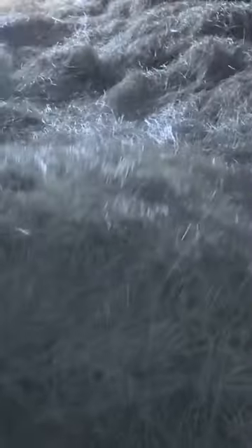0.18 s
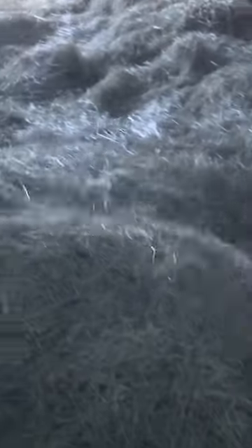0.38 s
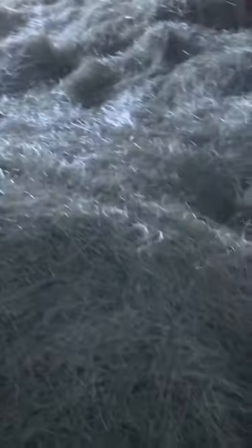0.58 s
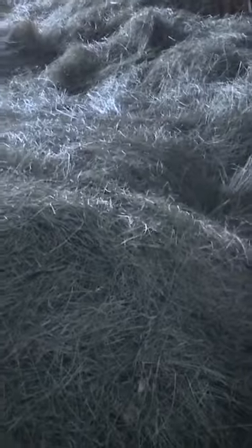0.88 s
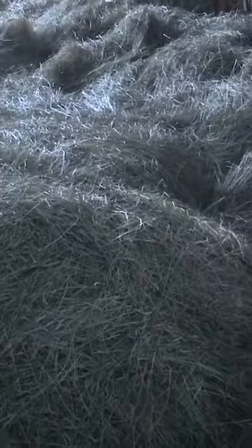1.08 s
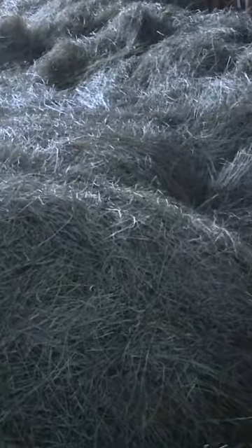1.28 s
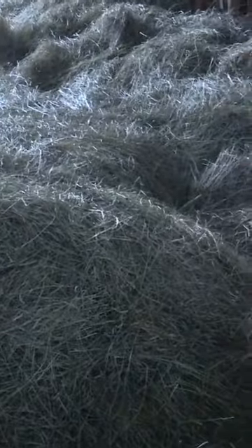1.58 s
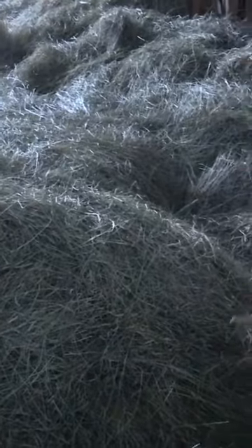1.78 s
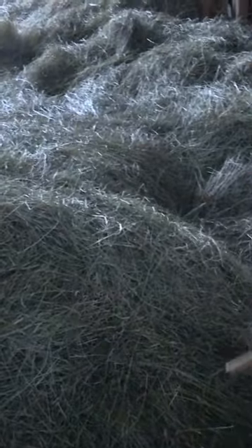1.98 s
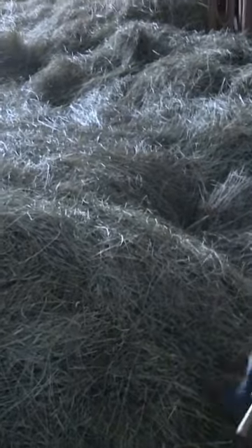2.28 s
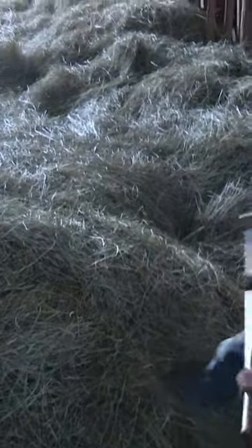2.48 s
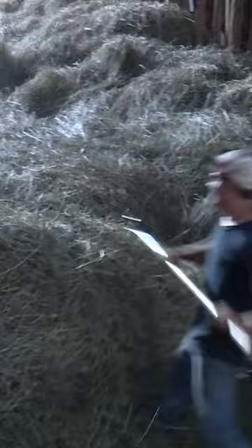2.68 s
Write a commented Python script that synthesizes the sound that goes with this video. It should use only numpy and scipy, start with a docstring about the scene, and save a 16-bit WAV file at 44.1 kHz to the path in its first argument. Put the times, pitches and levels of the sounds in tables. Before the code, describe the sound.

Close to the microphone, loose hay hisses and snaps; sharp ringing metal clinks come early, fainter ones follow over dull handling bumps, and a louder hay rustle ends it, with a barely audible low hum beneath.

```python
"""In a barn, loose dry hay is worked with a pitchfork: rubbing stalks hiss as coloured noise, crackle and snap.
Steel, probably the fork, clinks and rings: each contact is a ragged noise burst that sets decaying modes off.
Close to the microphone, moving about gives soft low buffets, made of low band-passed noise, as is the last low
crunch of the hay. A faint hum, noise through a narrow resonance, lies underneath in still air.
Both channels are alike."""
import sys
import numpy as np
from scipy import signal
from scipy.io import wavfile
from scipy.ndimage import uniform_filter1d

SR = 44100
rng = np.random.default_rng(int(sys.argv[2]) if len(sys.argv) > 2 else 0)


def digitize_waveform(pressure):
    """Quantize a signal to 16-bit integers and store it at the path in sys.argv[1].

    Rows of a 2-D input are taken as channels; values are limited to [-1, 1].
    """
    field = np.atleast_2d(pressure).T
    bounded = np.clip(field, -1, 1)
    quanta = np.round(bounded * 32767).astype(np.int16)
    wavfile.write(sys.argv[1], SR, quanta)


N = 123480
TIME = np.arange(N) / SR


def from_db(db):
    """Decibels to gain."""
    return 10 ** (np.asarray(db) / 20)


def rms_one(x):
    """Scale to unit power."""
    return x / np.sqrt(np.mean(x ** 2) + 1e-20)


def white():
    """White noise."""
    return rng.standard_normal(N)


def in_time(rows):
    """A curve of (time, level) points, read at every sample."""
    return np.interp(TIME, *np.transpose(rows))


def drift(corner_hz):
    """Random wandering with spread 1: noise through two equal low-pass poles, at a fortieth of the rate."""
    step = 40
    r = np.exp(-2 * np.pi * corner_hz * step / SR)
    settling = 2000
    noise = rng.standard_normal(N // step + settling + 2)
    slow = signal.lfilter([1], [1, -2 * r, r * r], noise)[settling:]
    return np.interp(np.arange(N) / step, np.arange(len(slow)), rms_one(slow))


def blow(start, rise, t60):
    """A level that rises in a straight line, then falls by 60 dB in every t60."""
    age = TIME - start
    fall_db = -60 * np.clip((age - rise) / t60, 0, 2)
    return np.clip(age / rise, 0, 1) * from_db(fall_db)


def tone(hz):
    """A sine of height 1 at a random phase."""
    return np.sin(2 * np.pi * (hz * TIME + rng.random()))


def resonate(x, hz, width_hz):
    """A two-pole resonance with gain 1 on top."""
    r = np.exp(-np.pi * width_hz / SR)
    feed = np.array([1, 0, -1]) * (1 - r * r) / 2
    return signal.lfilter(feed, [1, -2 * r * np.cos(2 * np.pi * hz / SR), r * r], x + 1e-18)


def band_pass(x, low_hz, high_hz):
    """Keep what lies between two edges."""
    return signal.sosfilt(signal.butter(2, [low_hz, high_hz], "band", fs=SR, output="sos"), x)


def colour(x, spectrum, flicker_db=0):
    """Half-octave bands, each at its own level and with its own flicker; rms 1."""
    hz, db = np.transpose(spectrum)
    edges = np.geomspace(20, 18000, 21)
    out = 0
    for low, high in zip(edges, edges[1:]):
        if high > hz[0] and low < hz[-1]:
            level_db = np.interp(np.log(low * high) / 2, np.log(hz), db)
            band = band_pass(x, low, high) * from_db(level_db + flicker_db * drift(31))
            out = band - out  # signs alternate, as neighbours oppose in phase at their shared edge
    return rms_one(out)


def split(x, hz):
    """The parts below and above a frequency, each filtered twice for a steep edge."""
    parts = []
    for kind in ("low", "high"):
        once = signal.butter(2, hz, kind, fs=SR, output="sos")
        parts.append(signal.sosfilt(np.tile(once, (2, 1)), x))
    return parts


BASS_HZ, TREBLE_HZ = 2030, 5300  # edges of the middle band of the clinks


def three_bands(x):
    """Bass, middle and treble of a sound."""
    low, rest = split(x, BASS_HZ)
    return np.array([low, *split(rest, TREBLE_HZ)])


# how hard the hay is stirred, heard as the level of the rustle: (time [s], level [dB])
STIRRING = [(0, -34.5), (.12, -36.5), (.34, -33.5), (.44, -38), (.6, -42), (.97, -47.5), (1.2, -42.5),
            (1.4, -42.5), (1.62, -46.5), (1.8, -45.5), (1.95, -52.5), (2.06, -50), (2.13, -44.5),
            (2.27, -43.5), (2.42, -37), (2.65, -31.5)]
# the rustle's treble against its body: (time [s], level [dB])
SHEEN_LEVEL = [(0, 3.5), (.2, -1), (.36, 2.5), (.6, -5.5), (1.3, -0.5), (1.85, -2.5), (2.3, 1),
               (2.55, -1.5), (2.8, -4)]
# colour of the rubbing stalks: (frequency [Hz], level [dB per Hz])
RUSTLE_COLOUR = [(300, -10), (700, -6.5), (1500, -2), (2000, -5), (3000, -1.5), (8400, -2.5), (12000, -4.5),
                 (15500, -8.5)]
SHEEN_HZ = 8300  # the treble starts here
RUSTLE_DB, RUSTLE_FLICKER_DB = 1, 2  # level against the stirring; spread in each band
CRACKLES_PER_S, CRACKLE_DB = 2600, -9.5  # level against the stirring
CRACKLE_SPREAD_DB, CRACKLE_CYCLES = 1, 8  # cycles set how narrow each crackle's resonance is


def hay():
    """Countless stalks rub into a hiss; tiny cracks, each ringing a resonance, stand out of it."""
    sizes = from_db(CRACKLE_SPREAD_DB * np.minimum(rng.exponential(1, N), 5)) * rng.choice([-1, 1], N)
    cracks = sizes * (rng.random(N) < CRACKLES_PER_S / SR)
    pitches = np.geomspace(1800, 13000, 12)
    dealt = rng.integers(0, len(pitches), N)  # which pitch a crack gets
    crackle = 0
    for k, hz in enumerate(pitches):
        crackle = crackle + resonate(cracks * (dealt == k), hz, 2 * hz / CRACKLE_CYCLES)
    rustle = colour(white(), RUSTLE_COLOUR, RUSTLE_FLICKER_DB)
    mix = from_db(RUSTLE_DB) * rustle + from_db(CRACKLE_DB) * rms_one(crackle)
    body, sheen = split(mix, SHEEN_HZ)
    return from_db(in_time(STIRRING)) * (body + from_db(in_time(SHEEN_LEVEL)) * sheen)


# steel contacts: (time [s], rise [s], clatter level [dB], bass against middle [dB], treble against middle [dB],
# ring level [dB], ring t60 [s], modes that ring most [Hz], strongest first)
STEEL_CONTACTS = [ (0.2017, 0.00083, -27, -15, 1, -22, 0.1, (7948, 8909)),
                  (.209, .002, -33, -13, -2, -26.5, 0.1, (4750, 3370, 5600)),
                  (0.4725, .0015, -27, -0.5, 9, -24, .2, (2590, 9502, 2150)),
                  (.480, .003, -19.5, 2, 3, -14.5, .24, (3440,)),
                  (.483, 0.0071, -19.5, -6, 2, -7, 0.027, (8258, 8909)),
                  (0.525, .006, -40, 9, 4, -24, 0.19, (6425,)),
                  (.564, .005, -28, 3.5, 1, -23, .13, (8258,)),
                  (0.608, 0.0019, -33.5, -2, -0.5, -26, 0.11, (4750, 3880, 4260, 5220)),
                  (0.61, .003, -47, -8, 1, -31.5, 0.088, (12630, 12150)),
                  (.652, 0.00386, -47, 4, -13, -39.5, .22, (2590, 5900, 3440, 8258)),
                  (.690, 0.024, -62, -18, 7.5, -39.5, .17, (2590,)),
                  (.965, .008, -60, 2, -10, -44, 0.12, (3880, 2280)),
                  (0.9962, 0.00088, -32.5, 6, 5, -30.5, .09, (6960,)),
                  (1.001, 0.0054, -29, 3, -5, -24.5, .2, (3440, 2280)),
                  (1.014, .008, -33, 4, -3, -30, .19, (3370, 4260, 3010)),
                  (1.044, .003, -49, -2, -8, -31.5, 0.068, (4260,)),
                  (1.206, .012, -37.5, 5, -5, -38, .16, (2590, 3440, 3010)),
                  (1.673, .006, -41, -15, 1.5, -40.5, 0.14, (3440, 3010, 2590, 5900)),
                  (1.746, .0007, -37, 0, -3.5, -39.5, .13, (2590, 5900)),
                  (1.754, .004, -42.5, -8, -3, -37, 0.087, (3880, 3440, 2280, 12150)),
                  (2.436, .006, -30.5, 9.5, -7, -30.5, 0.088, (4400, 1583)),
                  (2.448, .002, -28.5, 1, 2.5, -28, 0.17, (2280, 2590)),
                  (2.458, 0.0032, -30, 5, -4, -28, .14, (3440, 4750)),
                  (2.497, 0.0061, -31.5, 3.5, -6, -30.5, .13, (3370, 3880, 4260))]
# main modes of the steel: (frequency [Hz], level against the clatter [dB])
STEEL_MODES = [(1305, -22), (1583, -18.5), (1900, -16.5), (2280, -13), (2590, -12.5), (2920, -12.5),
               (3010, -21), (3370, -29), (3440, -9), (3880, -9), (4260, -26), (4400, -31), (4750, -19),
               (5220, -15), (5900, -19), (6425, -9.5), (6960, -9), (7948, -42), (8258, -5), (8909, -22),
               (9502, -14), (10190, -11.5), (12150, -19), (12630, -24), (12892, -19), (13790, -22),
               (14578, -16)]
# colour of the clatter: (frequency [Hz], level [dB per Hz])
CLATTER_COLOUR = [(500, -15), (800, -12), (1400, -7.5), (2500, 5.5), (3800, 3.5), (5500, -1.5), (8500, -1),
                  (12000, -5.5), (15500, -12)]
CLATTER_T60_S, TAIL_DB, TAIL_T60_S = 0.12, -6.5, 0.5  # the minor modes fade fast, then slowly
MINOR_MODE_WIDTH_HZ = 26
CLATTER_NOISE_DB, CONTACT_T60_S = -8.5, 0.13  # the crack: level against the minor modes, and its fade
# the parts chatter unevenly against each other while they touch
RATTLE_DB, RATTLE_CORNER_HZ = 7, 280
STRIKE_SPREAD_DB = 1.5  # of each main mode from contact to contact
FAVOUR_STEP_DB = 2.5  # each further favoured mode is this much weaker
# each mode is doubled by a close neighbour, so its ring beats, as it does in the room
MODE_SPLIT_HZ = 13.7  # times a random 0.5 to 2
# higher modes die sooner: decay at 1 kHz, and the power of pitch by which it shortens
STEEL_T60_S, STEEL_DAMPING = .42, 0.33


def minor_modes():
    """Noise keeps many weak modes of the steel ringing."""
    pitches = np.linspace(650, 15500, 72) + rng.uniform(-90, 90, 72)
    chatter = white()
    ringing = 0
    for hz in pitches:
        ringing = ringing + resonate(chatter, hz, MINOR_MODE_WIDTH_HZ) * rng.choice([-1, 1])
    return colour(rms_one(ringing), CLATTER_COLOUR)


def ring_out(strikes, mode_hz):
    """Each main mode, struck by clicks, is a pair of decaying sines that beat."""
    mode_t60 = STEEL_T60_S * (mode_hz / 1000) ** -STEEL_DAMPING
    out = 0
    for clicks, hz, t60 in zip(strikes, mode_hz, mode_t60):
        r = from_db(-60 / (t60 * SR))
        for share, offset_hz in ((2 / 3, 0), (1 / 3, MODE_SPLIT_HZ * rng.uniform(.5, 2))):
            w = 2 * np.pi * (hz + offset_hz) / SR
            sine = signal.lfilter([0, np.sin(w)], [1, -2 * r * np.cos(w), r * r], clicks + 1e-18)
            out = out + share * sine
    return out


def steel():
    """Each contact is a short ragged crack that rings main and minor modes; the place struck favours a few."""
    rattle = from_db(RATTLE_DB * drift(RATTLE_CORNER_HZ))
    crack = from_db(CLATTER_NOISE_DB) * rms_one(colour(white(), CLATTER_COLOUR) * rattle)
    ringing, crack = three_bands(minor_modes()), three_bands(crack)
    mode_hz, mode_db = np.transpose(STEEL_MODES)
    mode_band = np.digitize(mode_hz, [BASS_HZ, TREBLE_HZ])
    out, strikes = 0, np.zeros((len(mode_hz), N))
    for s, rise, db, bass_db, treble_db, ring_db, ring_t60, favoured in STEEL_CONTACTS:
        tint = from_db([bass_db, 0, treble_db])
        tail = from_db(TAIL_DB) * blow(s, rise, TAIL_T60_S)
        fade = np.hypot(blow(s, rise, CLATTER_T60_S), tail)
        own_ringing = np.roll(tint @ ringing, -rng.integers(N // 10))  # another stretch each time
        own_crack = blow(s, rise, CONTACT_T60_S) * (tint @ crack)
        out = out + from_db(db) * (fade * own_ringing + own_crack)

        leads = [np.argmin(np.abs(mode_hz - hz)) for hz in favoured]
        ring = 0
        for rank, k in enumerate(leads):
            ring = ring + from_db(ring_db - FAVOUR_STEP_DB * rank) * tone(mode_hz[k])
        out = out + blow(s, rise, ring_t60) * ring

        spread_db = STRIKE_SPREAD_DB * rng.standard_normal(len(mode_hz))
        strengths = tint[mode_band] * from_db(db + mode_db + spread_db)
        strengths[leads] = 0  # these already ring as tones
        strikes[:, int((s + rise / 2) * SR)] += strengths * rng.choice([-1, 1], len(mode_hz))
    return out + ring_out(strikes, mode_hz)


# short single cracks: stalk snaps, dull knocks and a faint clink at 2.156 s:
# (time [s], peak level [dB], pitch [Hz], t60 of the burst [s])
SHORT_CRACKS = [(1.494, -34, 1490, 0.036), (1.989, -33, 1200, 0.035), (2.160, -35, 840, 0.047),
                (2.156, -29, 5300, 0.11), (2.293, -22, 4200, .008)]


def short_cracks():
    """Each snap, knock or clink is one noise burst through a resonance as wide as its pitch."""
    out = 0
    for s, db, hz, t60 in SHORT_CRACKS:
        crack = resonate(white() * blow(s, 0.00033, t60), hz, hz)
        out = out + from_db(db) * crack / np.abs(crack).max()
    return out


# soft low bumps at the microphone; the last is the low crunch of the hay:
# (time [s], rise [s], t60 [s], level [dB], upper edge [Hz])
LOW_BUMPS = [(.25, 0.078, 1, -32.5, 137), (0.337, 0.016, 0.16, -24.5, 181), (.745, 0.043, .25, -36.5, 298),
             (.843, 0.0053, 0.21, -34, 340), (.872, .015, 0.59, -31.5, 166),
             (0.939, 0.0059, 0.24, -34.5, 322), (1.031, 0.0089, 0.22, -29.5, 256),
             (1.208, 0.0057, .2, -33, 297), (1.285, 0.018, 0.4, -37.5, 138),
             (2.158, 0.0074, 0.19, -34, 140), (2.28, 0.043, 0.75, -49, 482)]
# the low rumble between the bumps: (time [s], level [dB])
RUMBLE_SWAY = [(0, -55), (.45, -52), (.9, -36), (1.2, -39.5), (1.7, -56), (2.05, -56.5), (2.25, -44.5),
               (2.8, -55)]
# colour of that rumble: (frequency [Hz], level [dB per Hz])
RUMBLE_COLOUR = [(22, -10), (43, 2), (100, 0), (170, -4.5), (260, -20), (500, -25)]
BUMP_FLOOR_HZ, BUMP_EVEN_S = 43.4, 0.023  # lower edge; window that evens out the noise


def buffets():
    """Movement close to the microphone, and a last low crunch of hay: soft noise bumps over a swaying rumble."""
    out = from_db(in_time(RUMBLE_SWAY)) * colour(white(), RUMBLE_COLOUR)
    for s, rise, t60, db, top_hz in LOW_BUMPS:
        push = band_pass(white(), BUMP_FLOOR_HZ, top_hz)
        push = signal.sosfilt(signal.butter(1, 2 * top_hz, fs=SR, output="sos"), push)
        push = push / np.sqrt(uniform_filter1d(push ** 2, int(BUMP_EVEN_S * SR)) + 1e-18)
        out = out + from_db(db) * blow(s, rise, t60) * push
    return out


# still air of the barn: (frequency [Hz], level [dB per Hz])
AIR_COLOUR = [(30, -10), (150, 0), (260, -6.5), (12000, -24)]
AIR_DB = -52.5
HUM_HZ, HUM_WIDTH_HZ, HUM_DB = 119.2, 33, -54.5  # width of each of two resonances in a row


def barn():
    """A faint hum, wavering because it is narrow noise, in still air."""
    hum = resonate(resonate(white(), HUM_HZ, HUM_WIDTH_HZ), HUM_HZ, HUM_WIDTH_HZ)
    return from_db(HUM_DB) * rms_one(hum) + from_db(AIR_DB) * colour(white(), AIR_COLOUR)


def scene():
    """All sources at one microphone, alike in both channels."""
    return np.tile(hay() + steel() + short_cracks() + buffets() + barn(), (2, 1))


PEAK, CUTOFF_HZ = .8, 15800  # ceiling of the rounded peaks (full scale 1); top of the treble


def record(dry):
    """The highest peaks are rounded and the top is cut steeply."""
    rounded = PEAK * np.tanh(dry / PEAK)
    return signal.sosfilt(signal.ellip(10, .1, 80, CUTOFF_HZ, fs=SR, output="sos"), rounded)


dry = scene()
out = record(dry)
digitize_waveform(out)
```